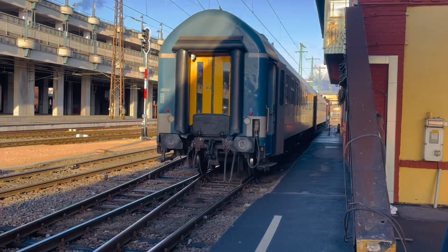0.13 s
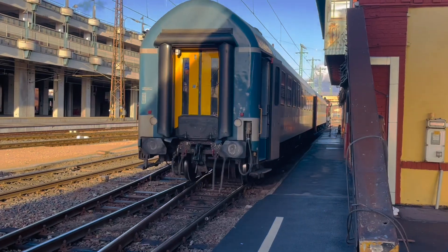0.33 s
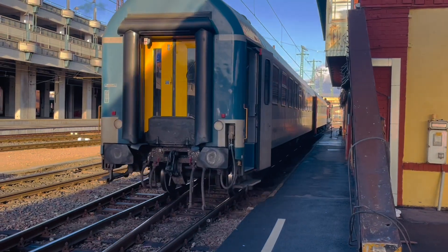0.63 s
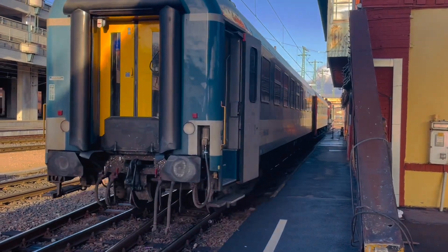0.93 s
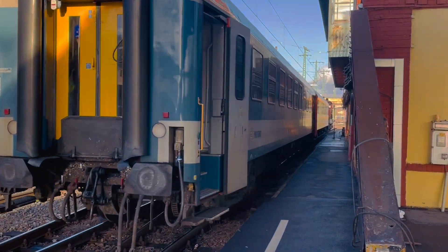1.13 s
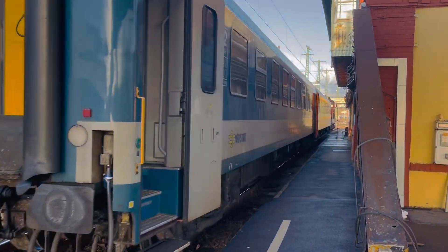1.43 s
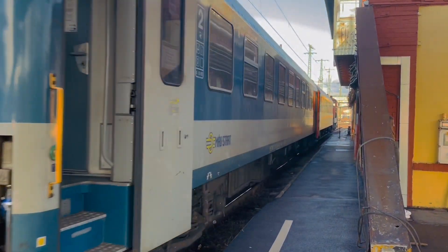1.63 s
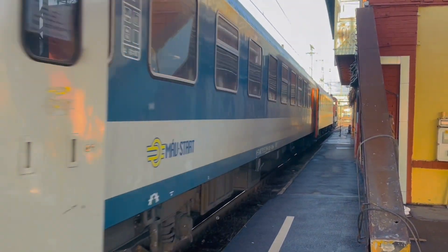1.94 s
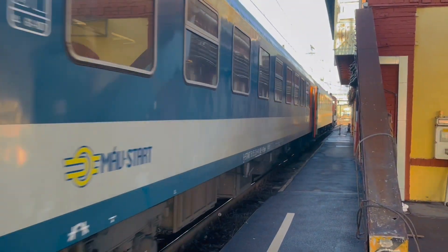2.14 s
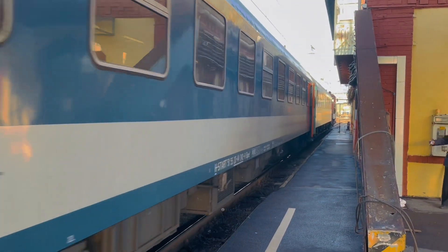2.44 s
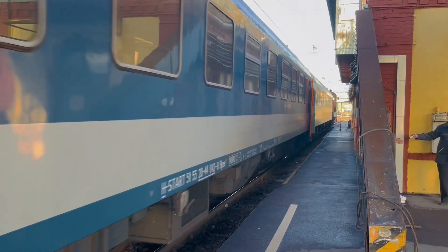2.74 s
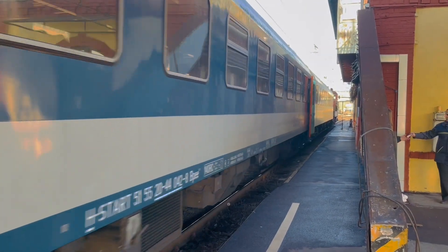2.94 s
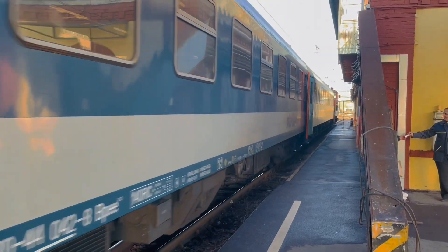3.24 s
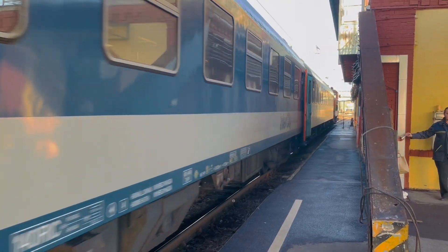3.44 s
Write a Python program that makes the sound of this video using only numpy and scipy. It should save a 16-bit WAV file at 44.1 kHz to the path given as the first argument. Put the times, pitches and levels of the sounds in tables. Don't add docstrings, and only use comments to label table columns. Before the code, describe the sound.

Train carriages roll past close by, rumbling steadily with heavy clacks and thumps at rail joints.

```python
import sys
import numpy as np
from scipy import signal
from scipy.fft import rfft, irfft, next_fast_len
from scipy.io import wavfile
from scipy.ndimage import uniform_filter1d, map_coordinates

SR = 44100
rng = np.random.default_rng(int(sys.argv[2]) if len(sys.argv) > 2 else 0)


def voltage_ratio(decibels):
    exponent = np.asarray(decibels, float) / 20
    return 10 ** exponent


def bounce(signal):
    frames = np.transpose(np.atleast_2d(signal))
    limited = np.clip(frames, -1, 1)
    pcm = np.round(limited * 32767).astype(np.int16)
    wavfile.write(sys.argv[1], SR, pcm)


N = 157437

# [t/s, rumble level/dB, wheel hiss level/dB]
ROLLING = [(0.06, -24, -41), (0.128, -20, -35), (0.23, -23.5, -41), (0.34, -18, -37), (0.47, -23.5, -49),
           (0.63, -22, -44), (0.77, -22.5, -44), (1.04, -29, -41.5), (1.302, -25.5, -42),
           (1.55, -23, -39.5), (2.01, -27, -38), (2.29, -26.5, -35.5), (2.79, -23, -37.5), (2.91, -18, -39),
           (3.06, -23, -36), (3.57, -25, -34.5)]
# [f/Hz, density/dB per Hz]
RUMBLE_COLOUR = [(15, -51), (25, -2), (72, -0.5), (224, -4.5), (257, -7.5), (362, -10), (444, -18.5),
                 (546, -18.5), (1500, -30), (1950, -40), (3300, -120)]
# [f/Hz, density/dB per Hz]
HISS_COLOUR = [(300, -1.5), (700, 3), (1500, -7.5), (3000, -13), (6000, -27.5), (8500, -28), (12000, -57),
               (15700, -36.5)]
# [f/Hz, width/Hz, level over the noise/dB]
BODY_MODES = [(75, 49, 2), (266, 16.5, 6.5), (319, 59, 2.5), (862, 110, 7.5)]
# [f/Hz, width/Hz, level over the noise/dB]
WHEEL_MODES = [(1581, 38, 3), (1970, 18, 4), (2384, 43, 4.5), (2940, 20, 5), (3300, 32, 2.5), (3531, 38, 4),
               (4142, 80, 3.5), (4630, 70, 3.5), (4898, 32, 4), (5352, 25, 3)]
# [t/s, length/s, level/dB]
FLOOR_DRONES = [
    (0.293, 0.056, -26),
    (0.434, 0.028, -19.5),
    (0.856, 0.088, -26.5),
    (1.68, 0.061, -29.5),
    (1.993, 0.096, -26),
    (2.145, 0.063, -31),
    (2.268, 0.076, -26),
    (2.436, 0.19, -24.5),
    (2.757, 0.085, -23),
    (3.333, 0.089, -23.5),
]
# [f/Hz, width/Hz, level/dB]
FLOOR_MODES = [(253.8, 20.5, -1), (313.5, 39, -1), (188, 65, -3), (841, 37, -11)]
# [t/s, peak level/dB, f/Hz, t60/s]
METAL_TICKS = [(.050, -32.5, 2880, 0.11), (1.825, -28, 3800, 0.062), (1.827, -30, 2540, 0.089),
               (0.694, -21.5, 402, 0.081), (.825, -28, 2190, 0.042), (1.018, -33.5, 1490, 0.44),
               (2.405, -33, 2460, .06), (2.545, -36, 2450, 0.1), (2.614, -19, 838, 0.13),
               (2.798, -28.5, 2320, 0.19), (2.913, -36, 2930, 0.35), (3.114, -31, 2175, 0.13)]
# [t/s, peak level/dB]
DRY_CLICKS = [
    (2.111, -35),
    (2.31, -50),
    (1.655, -53),
    (2.748, -56),
]
# [t/s, length/s, level/dB]
BRAKE_SQUEALS = [
    (0.134, .12, -40.5),
    (0.305, 0.068, -41),
    (0.444, 0.04, -42.5),
    (0.573, 0.07, -40.5),
    (0.879, 0.086, -42.5),
    (3.11, 0.1, -48),
    (3.27, 0.045, -51),
    (3.395, 0.1, -52),
]
# [f/Hz, width/Hz, level/dB]
BLOCK_MODES = [(4590, 310, 1.5), (5400, 210, 6), (10390, 170, 0), (10740, 220, -1), (12900, 300, -10.5),
               (13960, 300, 4)]
# [t/s, level/dB, rise/s, brightness/dB]
GEAR_RATTLES = [(0.123, -34.5, 0.045, 12.5), (0.273, -24, 0.023, 3.5), (0.399, -21.5, 0.022, 5.5),
                (0.553, -32.5, 0.02, 13.5), (0.823, -23.5, 0.034, 5.5), (1.641, -37.5, 0.025, 5),
                (1.77, -31, 0.0033, 2), (1.826, -43.5, .004, -7.5), (2.108, -40.5, 0.0019, 6.5),
                (2.329, -21, 0.013, 1.5), (2.758, -23.5, 0.022, 2), (2.808, -24.5, 0.02, 2.5),
                (3.087, -32, 0.024, 6.5), (3.258, -29.5, 0.015, 2), (3.37, -21, 0.0095, 3)]
# [f/Hz, density/dB per Hz]
GEAR_COLOUR = [(150, -8.5), (400, 8.5), (1000, -1.5), (2200, -10), (4500, -20), (7000, -26), (11000, -40.5),
               (15700, -47.5)]
# [t/s, peak level/dB, t60/s]
GEAR_CRACKS = [(0.0452, -33, 0.088), (0.1438, -32, 0.044), (0.1904, -34, 0.092), (0.2924, -29, 0.093),
               (0.396, -24.5, 0.11), (.406, -19, .08), (0.4135, -18, 0.14), (0.433, -23, 0.11),
               (0.467, -25, 0.092), (0.564, -31, .08), (0.705, -37, 0.031), (.824, -24.5, 0.27),
               (.8455, -25.5, 0.066), (0.883, -21, 0.089), (1.3333, -41, 0.07), (1.4167, -40, 0.15),
               (1.6267, -44, 0.034), (2.2118, -40.5, 0.025), (2.3365, -28.5, 0.18), (2.755, -28.5, 0.12),
               (2.7706, -31.5, 0.069), (2.842, -36.5, 0.034), (3.108, -31.5, 0.049), (3.185, -34, 0.067),
               (3.275, -32.5, 0.029), (3.2897, -33, 0.073), (3.358, -30, .15), (3.3725, -28, 0.049),
               (3.3985, -18, 0.047), (3.414, -24.5, 0.093), (3.5123, -35, .05)]
# [f/Hz, density/dB per Hz]
CRACK_COLOUR = [(300, 1), (1200, 4), (2500, -5), (5000, -18.5), (7000, -25), (11000, -29), (15700, -48)]
# [t/s, peak level/dB, f/Hz]
FRAME_KNOCKS = [(0.539, -17, 112), (.693, -13.5, 227), (.757, -18, 184), (.915, -16.5, 155),
                (.95, -17.5, 165), (1.084, -22.5, 306), (1.171, -34, 180), (1.289, -23, 260),
                (1.351, -17.5, 209), (1.42, -18, 280), (1.642, -20, 175), (1.695, -23, 282),
                (1.848, -22, 141), (2.129, -17.5, 268), (2.22, -17.5, 264), (2.592, -20, 249),
                (2.652, -21.5, 262), (3.067, -16, 456), (3.331, -18.5, 105), (3.399, -11, 227)]
# [t/s, peak level/dB, f/Hz]
BOGIE_THUMPS = [(0.049, -9.5, 70), (.068, -15.5, 109), (.218, -8, 101), (0.289, -10, 123), (.299, -9, 95),
                (0.424, -3.5, 134), (0.856, -4, 142), (0.998, -13.5, 113), (1.656, -16, 102),
                (2.058, -14, 101), (2.341, -15, 147), (2.772, -12, 121), (2.838, -5.5, 88),
                (3.009, -17, 90), (.46, -13, 59), (2.68, -15, 69.6), (3.2679, -7, 120), (3.259, -10.5, 115),
                (3.287, -10, 132), (3.39, -4.5, 166), (3.521, -22.5, 65)]
# [t/s, peak level/dB, f/Hz, held/s]
RAIL_CLACKS = [
    (.396, -10, 733, 0.01),
    (.416, -13.5, 1013, 0.0088),
    (.825, -16.5, 886, 0.02),
    (1.775, -27.5, 1360, 0.013),
    (2.338, -12, 748, 0.0051),
    (2.763, -12, 688, 0.0034),
    (3.361, -7, 803, 0.0034),
    (3.369, -9, 829, .004),
]
# [ratio to the clack's f, level/dB]
RAIL_MODES = [(0.719, -3.5), (0.884, 2.5), (1.001, 3.5), (1.131, 0), (1.319, -6), (1.549, -3.5),
              (1.904, -8), (2.602, -17)]
# [f/Hz, correlation]
PORT_LIKENESS = [(40, 1), (250, 0.88), (700, 0.74), (1500, .76), (3300, 0.82), (3900, .995), (8600, .98),
                 (14000, 0.9)]
# [f/Hz, lead/rad]
PORT_LEAD = [(300, .25), (3900, 0), (6250, 0), (6900, 3.14), (8500, 3.14), (9800, 0), (12200, 0),
             (13100, -2.9)]
# [f/Hz, level/dB]
PORT_TILT = [(30, -.4), (120, -1.2), (300, -1), (600, 0.6), (3000, 0.7), (6500, 0), (10000, 0)]


def unit(x):
    return x / np.sqrt(np.mean(x ** 2) + 1e-20)


def along(points, hz):
    f, v = np.transpose(points)
    return np.interp(np.log(hz + 1), np.log(f + 1), v)


def wobble(rate):
    return map_coordinates(rng.standard_normal(2000), [np.arange(N) * rate / SR])


def filtered(x, response):
    m = next_fast_len(N + SR // 2)
    return irfft(rfft(x, m) * response(np.fft.rfftfreq(m, 1 / SR)), m)[..., :N]


def highpass(f, hz, order):
    return 1 / (1 + (hz / (f + 1)) ** order)


def bell(f, hz, width):
    return 1 / (1 + (2 * (f - hz) / width) ** 2)


def rush(spectrum, patchy_db, peaks=()):
    z = signal.stft(rng.standard_normal((2, N)), nperseg=512)[2]
    field = uniform_filter1d(rng.standard_normal(z.shape[1:]), size=4, axis=0)
    field = uniform_filter1d(field, size=8, axis=1)
    pair = signal.istft(z * voltage_ratio(patchy_db * unit(field)), nperseg=512)[1][:, :N]

    def colour(f):
        resonances_db = sum(db * bell(f, hz, width) for hz, width, db in peaks)
        return voltage_ratio(along(spectrum, f) + resonances_db) * (f > 20)
    return unit(filtered(pair, colour))


def bands(peaks):
    def colour(f):
        return sum(voltage_ratio(db) * bell(f, hz, width) / np.sqrt(width) for hz, width, db in peaks)
    return unit(filtered(rng.standard_normal((2, N)), colour))


def swell(s, rise, hold, t60):
    out, start = np.zeros(N), max(int(s * SR), 0)
    end = min(N, start + int((rise + abs(hold) + 2 * t60) * SR) + 99)
    t = np.arange(start, end) / SR - s
    attack = np.clip(t / max(rise, 1e-3), 0, 1)
    release_s = np.clip(t - rise - abs(hold), 0, None)
    out[start:start + len(t)] = attack * voltage_ratio(-60 * release_s / max(t60, .005))
    return out


def tone(hz, s, turns=0):
    t = np.arange(N) / SR
    return np.sin(2 * np.pi * (hz * (t - s) + turns))


def rolling():
    s, low_db, high_db = np.transpose(ROLLING)
    t = np.arange(N) / SR
    lumps_db = 1 * wobble(9.28) + 1.7 * wobble(45)
    rumble_level = voltage_ratio(np.interp(t, s, low_db) + 0.5 + lumps_db)
    rumble = rumble_level * rush(RUMBLE_COLOUR + [(3500, -130)], 1.6, BODY_MODES)
    grain_db = 0.6 * wobble(7.35) + 1 * wobble(97)
    hiss_level = voltage_ratio(np.interp(t, s, high_db) + 5.5 + grain_db)
    return rumble + hiss_level * rush(HISS_COLOUR, 2.2, WHEEL_MODES)


def drones():
    shaking = sum(voltage_ratio(db) * swell(s, 0.008, length - .02, 0.67) for s, length, db in FLOOR_DRONES)
    return shaking * bands(FLOOR_MODES)


def ticks():
    ringing = np.zeros(N)
    for s, db, hz, t60 in METAL_TICKS:
        trio = sum(tone(hz * ratio, s) for ratio in (.96, 1, 1.03)) / 2
        ringing += voltage_ratio(db) * swell(s, 0.0018, 0.0011, t60) * trio
    clicks = sum(voltage_ratio(db) * swell(s, .001, 0, .005) for s, db in DRY_CLICKS) * rng.standard_normal(N)
    return np.array([ringing, np.roll(ringing, 40)]) + filtered(clicks, lambda f: highpass(f, 7000, 4))


def squeals():
    drift = .00015 * SR * wobble(12)
    at = np.clip(np.arange(N) + drift, 0, N - 1)
    block = np.array([map_coordinates(band, [at]) for band in bands(BLOCK_MODES)])
    scrape = voltage_ratio(2.8 * wobble(90) - 1.5)
    grip = sum(voltage_ratio(db) * swell(s, 0.011, length - .02, 0.2) for s, length, db in BRAKE_SQUEALS)
    return scrape * grip * block


def rattles():
    gear = rush(GEAR_COLOUR, 0.93, WHEEL_MODES) * voltage_ratio(0.68 * wobble(130) + 0.74 * wobble(29.6))
    top = filtered(gear, lambda f: highpass(f, 2500, 2))
    dull_power, bright_power = np.zeros(N), np.zeros(N)
    for s, db, rise, brightness in GEAR_RATTLES:
        shape = swell(s, rise, 0.011, 0.26) + voltage_ratio(-2) * swell(s, rise, 0, 0.88)
        dull_power += (voltage_ratio(db - brightness) * shape) ** 2
        bright_power += (voltage_ratio(db + brightness) * shape) ** 2
    return np.sqrt(dull_power) * (gear - top) + np.sqrt(bright_power) * top


def cracks():
    power = sum((voltage_ratio(db) * swell(s, 0.00066, 0.0025, t60)) ** 2 for s, db, t60 in GEAR_CRACKS)
    return np.sqrt(power) * rush(CRACK_COLOUR, 3) * voltage_ratio(1.5 * wobble(250))


def low_rings(events, rise_cycles, hold_cycles, fall_cycles, late):
    ring = np.zeros(N)
    for s, db, hz in events:
        shape = swell(s, rise_cycles / hz, hold_cycles / hz, fall_cycles / hz)
        ring += voltage_ratio(db) * shape * tone(hz, s)
    return np.array([ring, np.roll(ring, late)])


def knocks():
    return low_rings(FRAME_KNOCKS, 1, 1, 8.4, 70)


def thumps():
    return low_rings(BOGIE_THUMPS, 0.5, 0.15, 3.5, 90)


def clacks():
    out = np.zeros((2, N))
    phases = rng.random((len(RAIL_CLACKS), 2, len(RAIL_MODES)))
    for (s, db, hz, held), phase_pair in zip(RAIL_CLACKS, phases):
        ring = [sum(voltage_ratio(level) * tone(hz * ratio, s, turns) for (ratio, level), turns in zip(RAIL_MODES, port))
                for port in phase_pair]
        out += voltage_ratio(db - 8) * swell(s, 0.00098, held, 0.049) * np.array(ring)
    return out


def ports(pair):
    def mix(f):
        turn = np.arccos(np.clip(along(PORT_LIKENESS, f), 0, 1)) / 2
        return np.array([np.cos(turn), np.sin(turn)])

    def lean(f):
        left = voltage_ratio(along(PORT_TILT, f) / 2) * np.exp(.5j * along(PORT_LEAD, f))
        return np.array([left, 1 / left])
    mid, side = filtered(pair, mix)
    return filtered(np.array([mid + side, mid - side]), lean)


def scene():
    background = rolling() + drones()
    loose_parts = ticks() + squeals() + rattles() + cracks()
    joints = knocks() + thumps() + clacks()
    return ports(background + loose_parts + joints)


def low_pass(x):
    return signal.sosfilt(signal.butter(12, 15700, fs=SR, output="sos"), x)


def record(dry):
    low_cut_hz, top_hz = 42, 15750
    ceiling, knee = .85, 4
    start_s = 0.0451

    def microphone(f):
        slow = (1j * f / (low_cut_hz / 2 + 1j * f)) ** 2
        steep = 1 / np.sqrt(1 + (low_cut_hz / (f + 1)) ** 8)
        return (f < top_hz) * slow * steep
    heard = filtered(dry, microphone)
    heard = heard / (1 + np.abs(heard / ceiling) ** knee) ** (1 / knee)
    opening = swell(start_s, 0.002, N / SR - start_s - .008, 0.047)
    return low_pass(heard * opening)


dry = scene()
out = record(dry)
bounce(out)
```